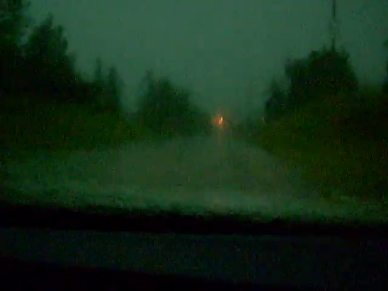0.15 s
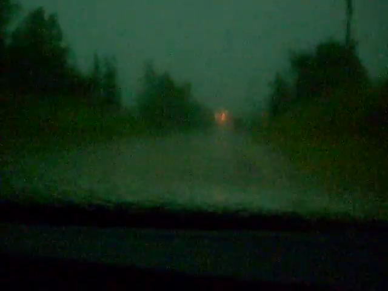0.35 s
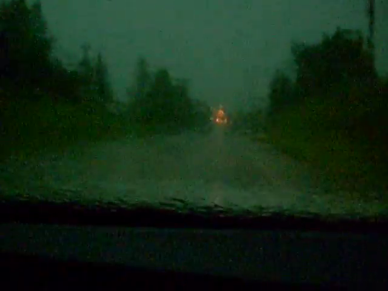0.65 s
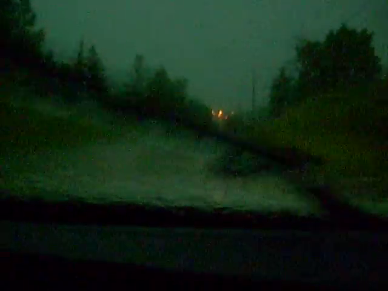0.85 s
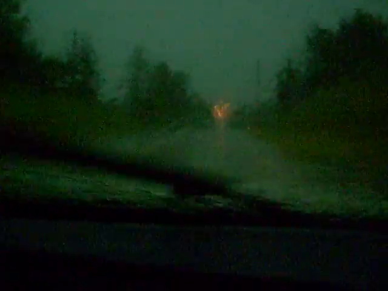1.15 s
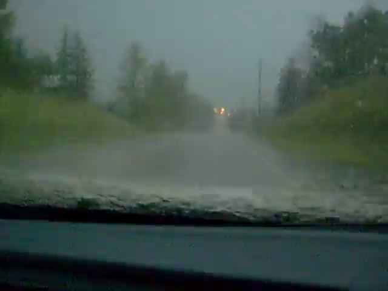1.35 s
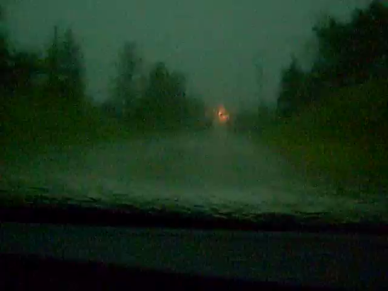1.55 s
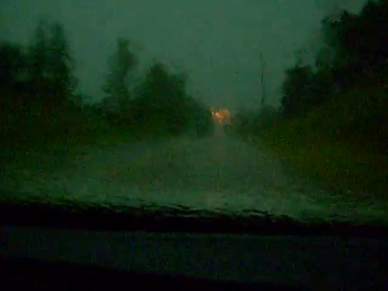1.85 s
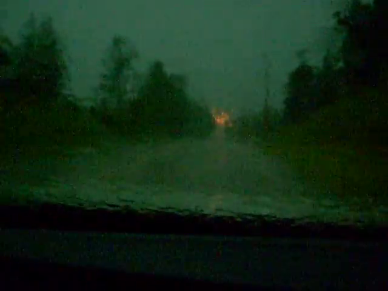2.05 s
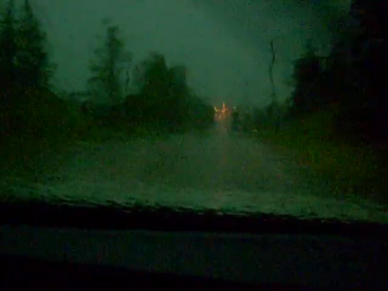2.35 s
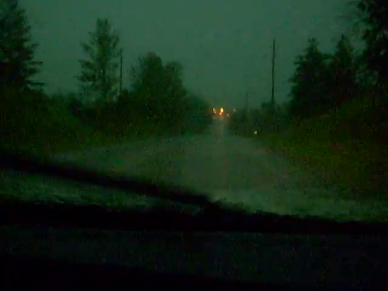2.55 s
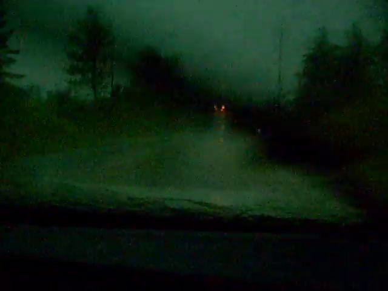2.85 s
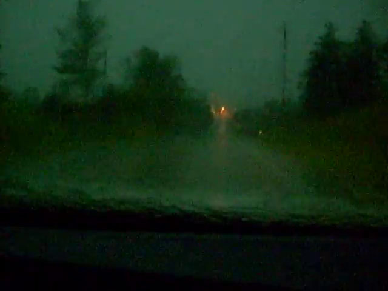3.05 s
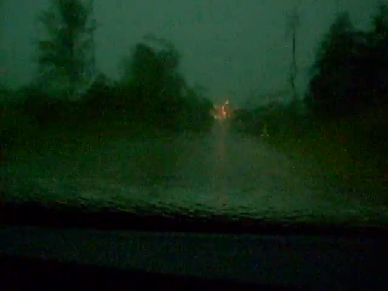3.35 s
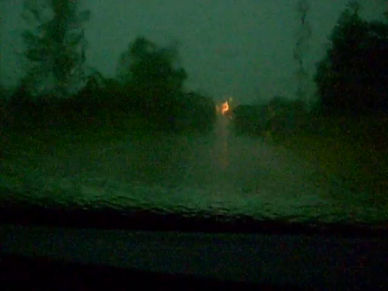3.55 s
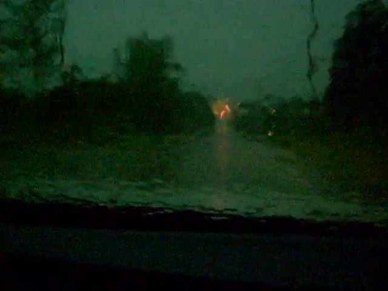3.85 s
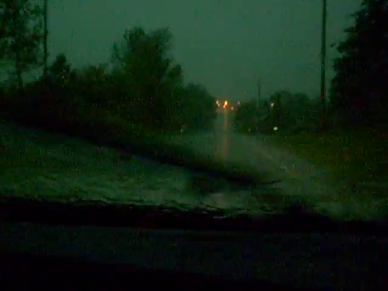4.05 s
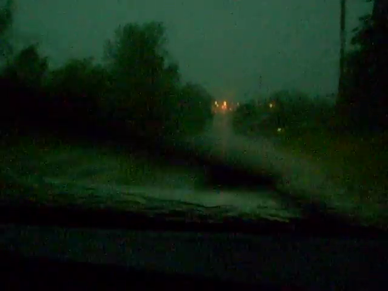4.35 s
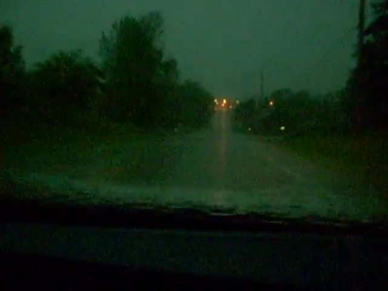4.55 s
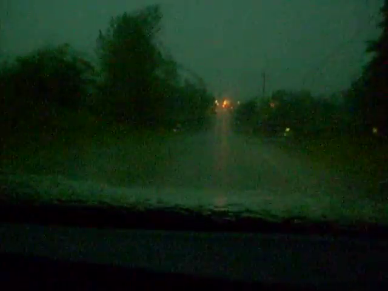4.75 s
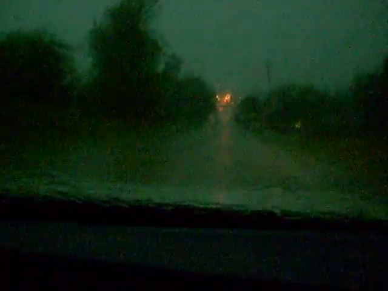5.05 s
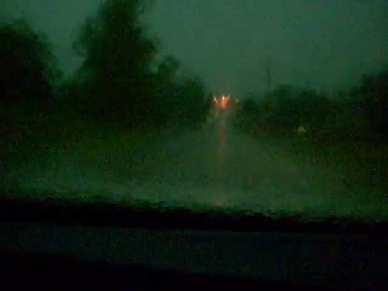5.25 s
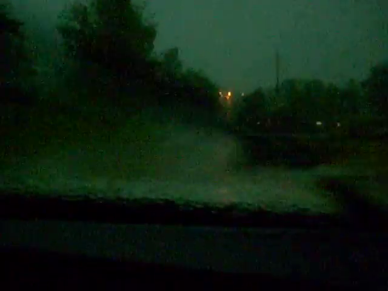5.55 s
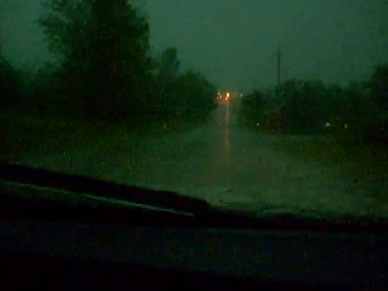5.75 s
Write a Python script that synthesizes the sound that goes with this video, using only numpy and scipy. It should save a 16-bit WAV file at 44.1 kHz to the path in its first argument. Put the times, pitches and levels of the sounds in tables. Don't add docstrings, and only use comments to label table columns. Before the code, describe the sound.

Dense gusty rain rattles over a car cabin while wipers knock, squeak once, and the engine slows to a coast.

```python
import sys
import numpy as np
from scipy import signal
from scipy.fft import rfft, irfft
from scipy.io import wavfile
from scipy.ndimage import uniform_filter1d

SR = 44100
rng = np.random.default_rng(int(sys.argv[2]) if len(sys.argv) > 2 else 0)


def inscribe(sig):
    pcm = np.round(np.clip(np.atleast_2d(sig).T, -1, 1) * 32767)
    wavfile.write(sys.argv[1], SR, pcm.astype(np.int16))


def elevation(decibels):
    levels = np.asarray(decibels, float)
    return 10 ** (levels / 20)


N = 259744

# t/s, level at port ring/dB, glass treble re that level/dB
GUSTS = [(0.0, -24, -29), (0.13, -26.5, -30.5), (0.42, -23.5, -34.5), (0.78, -28.5, -32.5),
         (1.2, -29.5, -31), (1.36, -24.5, -31.5), (1.7, -25.5, -32), (2.2, -28.5, -28.5), (2.5, -31.5, -36),
         (2.95, -26.5, -28.5), (3.33, -24, -31), (3.88, -30.5, -32.5), (4.3, -30.5, -35.5),
         (4.68, -26.5, -35.5), (5.07, -35, -30), (5.27, -22, -36.5), (5.58, -31.5, -31.5),
         (5.89, -27.5, -30.5)]
# middle t/s, half length/s, rise/dB
SHEETS = [(0.978, 0.12, 4), (3.3, 0.014, 2.5), (3.5, 0.068, -2), (3.54, 0.23, 1), (3.1, 0.048, 2.5),
          (4.2, 0.038, 2), (6.1, 0.019, -2), (3.1, 0.041, -4.5), (3.4, .04, -3), (2, 0.025, -5.5),
          (4.2, 0.11, 0.5), (0.25, 0.066, 0), (5.78, 0.018, -2)]
# t/s, peak level/dB
BIG_DROPS = [(0.0553, -12), (0.34, -10), (0.4618, -11), (0.4883, -14), (0.5676, -15), (0.603, -29),
             (1.0287, -8.5), (1.4152, -4.5), (1.5372, -14), (1.585, -13), (1.6212, -13), (1.728, -6),
             (1.9804, -6), (2.4581, -22.5), (2.6933, -11), (3.177, -21), (3.763, -14), (3.8716, -22.5),
             (3.9943, -14), (4.0786, -21), (4.4287, -26), (4.942, -11.5), (5.025, -22), (5.094, -16.5),
             (5.186, -14), (5.2669, -9.5), (5.402, -8), (5.4904, -16), (5.5432, -8.5), (5.5682, -9.5)]
# t/s, peak level/dB
GLASS_DROPS = [(0.4868, -37), (0.6875, -40), (0.9772, -37), (0.9982, -38), (1.274, -39), (1.3264, -39),
               (1.4127, -38), (1.4656, -43), (2.0268, -45), (2.0607, -39), (2.09, -34), (2.2423, -36),
               (2.3244, -33.5), (2.3685, -46), (2.7856, -36), (2.885, -40), (3.0335, -40), (3.5332, -40),
               (3.8385, -56), (3.9933, -47), (4.1868, -41), (4.435, -41), (4.6414, -40), (4.7267, -49),
               (4.8094, -36.5), (5.404, -41), (5.4935, -37), (5.5413, -39), (5.6037, -36), (5.6545, -42)]
# f/Hz, gain/dB
ROOF_RESPONSE = [(60, -13.5), (270, -3), (450, -4), (1000, -4), (1650, -7.5), (1900, -4.5), (2200, -6.5),
                 (3200, -6.5), (3750, -7.5), (4100, -6.5), (5500, -14.5), (8000, -23), (12000, -33)]
# f/Hz, gain/dB
GLASS_RESPONSE = [(300, -34), (1500, -18.5), (4000, 1), (6500, 1), (10000, -3), (12000, -17)]
# f/Hz, gain/dB
KNOCK_RESPONSE = [(100, -30), (700, -5.5), (2200, -6.5), (3200, -5.5), (4500, -7), (7000, -16),
                  (12000, -31.5)]
# t/s, firing rate f/Hz, level/dB
ENGINE = [
    (0.0, 94.17, -51),
    (0.2, 95.2, -51),
    (3.2, 94.46, -48),
    (3.4, 93.5, -52),
    (3.75, 88, -59.5),
    (4.2, 74.36, -55),
    (4.35, 71.5, -50),
    (4.7, 71.1, -52.5),
    (4.85, 68.2, -65),
    (5.89, 61, -67),
]
# multiple of firing rate, level/dB
ENGINE_ORDERS = [(.5, -18.5), (1, -0.5), (1.5, -7.5), (2, -2), (2.5, -7), (3, -5.5)]
# f/Hz, gain/dB
BODY_RESPONSE = [(20, -1), (45, -2), (100, 5.5), (180, 4), (270, 1.5), (400, -0.5), (1000, -9.5),
                 (2500, -29)]
# f/Hz, width/Hz, level/dB
PANELS = [(229.5, 18, -55), (270, 14, -50.5), (292.7, 24, -58)]
# middle t/s, half length/s, deep boom rise/dB, floor pan rise/dB
BUMPS = [
    (0.154, 0.17, 8, 2),
    (0.547, 0.31, 13.5, -0.5),
    (3.3, .15, 4.5, -3),
    (3.742, .04, 0, 6.5),
    (4.923, 0.15, 11.5, 2.5),
    (5.876, 0.035, 8, 0),
]
# t/s, peak level/dB
SHELL_TICKS = [(.349, -23.5), (4.4817, -23.5), (5.2482, -17)]
REVERSAL_DB = [1.5, -0.38, -1, -3]
# t from foot of sweep/s, peak level/dB, f/Hz, t60/s
WIPER_KNOCKS = [
    (-.155, -29.5, 184.5, 0.1),
    (0.0, -31.5, 117.7, 0.15),
    (0.005, -37, 260, .18),
    (0.031, -51, 431, 0.047),
]
# t/s, peak level/dB, f/Hz, t60/s
SUSPENSION = [(4.763, -34.5, 110, 0.25), (4.951, -31, 64.6, 0.17), (5.84, -36, 79.3, 0.3)]
# t/s, length/s, start f/Hz, end f/Hz, level/dB
SQUEAKS = [(2.545, 0.055, 1750, 1930, -44.5)]
# f/Hz, gain/dB
CONVERTER_RESPONSE = [(9500, 0.5), (10500, 2.5), (11000, -2), (11600, -4), (12000, -14), (12500, -39.5),
                      (14000, -49.5)]

CABIN_T60_S, CABIN_ECHO_DB = 0.045, -1.5
MIDDLE_DROPS_PER_S, MIDDLE_DROPS_DB = 70, -17.5
PAN_DB, DEEP_DB, SPRAY_DB = -42, -55, -47.5
WIPER_FIRST_S, WIPER_PERIOD_S = 1.187, 1.568
WIPER_SHAKE_S, WIPER_SHAKE_DB = 0.09, 8
PORT_HZ, PORT_WIDTH_HZ = 3220, 260


def level(x, db):
    return x * elevation(db) / np.sqrt(np.mean(x ** 2))


def curve(table):
    s, *columns = np.transpose(table)
    return [np.interp(np.arange(N) / SR, s, c) for c in columns]


def swell(middle_s, half_s):
    return np.exp(-((np.arange(N) / SR - middle_s) / half_s) ** 2)


def walk(rate_hz):
    k = int(SR / rate_hz)
    held = np.repeat(rng.standard_normal(N // k + 1), k)
    return 1.16 * uniform_filter1d(uniform_filter1d(held, k), k)[:N]


def colour(x, points):
    size = 4096
    hz, db = np.transpose(points)
    bins_hz = np.arange(size // 2 + 1) * SR / size
    log_gain = np.interp(np.log(bins_hz + 1), np.log(hz), db) * np.log(10) / 20
    cep = irfft(log_gain)
    cep[1:size // 2] *= 2
    cep[size // 2 + 1:] = 0
    impulse = irfft(np.exp(rfft(cep)))[:size // 2]
    return signal.fftconvolve(x, impulse)[:N]


def band(lo_hz, hi_hz):
    sos = signal.butter(2, [lo_hz, hi_hz], "bandpass", fs=SR, output="sos")
    return level(signal.sosfilt(sos, rng.standard_normal(N)), 0)


def smear(power, fade_s):
    keep = np.exp(-1 / (fade_s * SR))
    return signal.lfilter([1 - keep], [1, -keep], power)


def splats(hits, splat_s, echo_db):
    power = smear(smear(hits ** 2, splat_s), splat_s / 2)
    power = power + elevation(2 * echo_db) * smear(power, CABIN_T60_S / np.log(1e6))
    return np.sqrt(power) * rng.standard_normal(N)


def random_drops(rate_per_s, spread_db):
    luck, size = rng.random(N), rng.exponential(size=N)
    return (luck < rate_per_s / SR) * elevation(spread_db * np.minimum(size, 3))


def patter(rate_per_s, spread_db, echo_db):
    hits = random_drops(rate_per_s, spread_db) / np.sqrt(rate_per_s)
    return level(splats(hits, 0.0004, echo_db), 0)


def blows(table, late_s):
    s, db = np.transpose(table)
    x = np.zeros(N)
    x[np.minimum(((s + late_s) * SR).astype(int), N - 1)] = elevation(db)
    return x


def big_drops(gust_db):
    middle_db = MIDDLE_DROPS_DB + 0.66 * (gust_db - gust_db.mean())
    hits = blows(BIG_DROPS, 0.0008) + random_drops(MIDDLE_DROPS_PER_S, 1.75) * elevation(middle_db)
    knocks = hits + elevation(-5.0) * splats(hits, 0.00057, CABIN_ECHO_DB)
    return elevation(8.5) * colour(knocks, KNOCK_RESPONSE)


def hard_drops():
    hits = splats(blows(GLASS_DROPS, 0.00035), 0.00046, CABIN_ECHO_DB - 8.0)
    return elevation(26.5) * colour(hits, GLASS_RESPONSE)


def rain():
    gust_db, treble_db = curve(GUSTS)
    gust_db = gust_db + sum(db * swell(s, half_s) for s, half_s, db in SHEETS)
    slow_db = uniform_filter1d(gust_db + treble_db, SR // 3)
    density = elevation(1.6 * (slow_db - slow_db.mean()))
    clumps_db = walk(27.923)
    clumps_db = clumps_db - uniform_filter1d(clumps_db, SR // 6)
    clumps_db = clumps_db / np.sqrt(np.clip(density, 0.4, 2))

    dull = patter(1900 * density, 2.7, CABIN_ECHO_DB)
    roof = level(colour(dull, ROOF_RESPONSE), -11.5) * elevation(gust_db + clumps_db)
    bright = patter(330 * density, 3.6, -8.0)
    glass = level(colour(bright, GLASS_RESPONSE), 12.6) * elevation(gust_db + treble_db + 1.3 * clumps_db)
    return roof + glass + big_drops(gust_db) + hard_drops()


def engine():
    firing_hz, engine_db = curve(ENGINE)
    phase = 2 * np.pi * np.cumsum(firing_hz * (1 + 0.0037 * walk(9))) / SR
    hum = np.zeros(N)
    for order, order_db in ENGINE_ORDERS:
        gain = np.sqrt(2) * elevation(engine_db + order_db + 2.2 * walk(10))
        hum += gain * np.sin(order * phase + 2 * np.pi * rng.random())
    return hum


def sweeps():
    return WIPER_FIRST_S + WIPER_PERIOD_S * np.arange(4)


def road():
    deep_db = DEEP_DB + 1.8 * walk(9)
    pan_db = PAN_DB + 1.1 * walk(15)
    for s, half_s, deep_rise_db, pan_rise_db in BUMPS:
        bump = swell(s, half_s)
        deep_db += deep_rise_db * bump
        pan_db += pan_rise_db * bump
    for s, force_db in zip(sweeps(), REVERSAL_DB):
        pan_db += (WIPER_SHAKE_DB + force_db) * swell(s - 0.015, WIPER_SHAKE_S)
    pan = level(colour(rng.standard_normal(N), BODY_RESPONSE), -2.5) * elevation(pan_db)

    panels = np.zeros(N)
    for hz, width_hz, db in PANELS:
        panels += band(hz - width_hz / 2, hz + width_hz / 2) * elevation(db - 1.0 + 1.7 * walk(4))

    spray_db = SPRAY_DB + 0.4 * (curve(GUSTS)[0] + 27.0) + 1.1 * walk(5) + 1.8 * walk(25)
    return pan + panels + band(320, 1900) * elevation(spray_db) + band(32, 62) * elevation(deep_db)


def shell_ticks():
    return signal.lfilter([1, -1], [1, -0.6], blows(SHELL_TICKS, 0))


def thumps():
    knocks = list(SUSPENSION)
    for s, force_db in zip(sweeps(), REVERSAL_DB):
        for late_s, db, hz, t60_s in WIPER_KNOCKS:
            knocks.append((s + late_s, db + force_db, hz, t60_s))
    out = np.zeros(N + SR)
    t = np.arange(SR // 2) / SR
    tail = np.append(band(140, 750), np.zeros(SR))
    for s, db, hz, t60_s in knocks:
        i = int(s * SR)
        shape = (1 - np.exp(-t / 0.0032)) * np.exp(-np.log(1000) * t / t60_s)
        body = np.sin(2 * np.pi * hz * t) + elevation(-7.0) * tail[i:i + len(t)]
        out[i:i + len(t)] += elevation(db) * shape * body
    return out[:N]


def wiper_squeak():
    t = np.arange(N) / SR
    out = np.zeros(N)
    for s, length_s, start_hz, end_hz, db in SQUEAKS:
        part = np.clip((t - s) / length_s, 0, 1)
        hz = (start_hz + (end_hz - start_hz) * part) * (1 + 0.037 * walk(150))
        tone = np.sin(2 * np.pi * np.cumsum(hz) / SR)
        out += elevation(db + 3.0 * walk(90)) * np.sin(np.pi * part) * tone
    return out


def scene():
    return (rain() + engine() + road() + thumps() + wiper_squeak())[None]


def band_limit(x):
    return signal.sosfilt(signal.butter(12, 12250, fs=SR, output="sos"), x)


def record(dry):
    w = 2 * np.pi * PORT_HZ / SR
    r = np.exp(-np.pi * PORT_WIDTH_HZ / SR)
    ring = [1, -2 * r * np.cos(w), r * r]
    port = signal.lfilter([sum(ring)], ring, dry[0])
    mix = colour(port + shell_ticks(), CONVERTER_RESPONSE)[None]
    return band_limit(mix)


dry = scene()
out = record(dry)
inscribe(out)
```